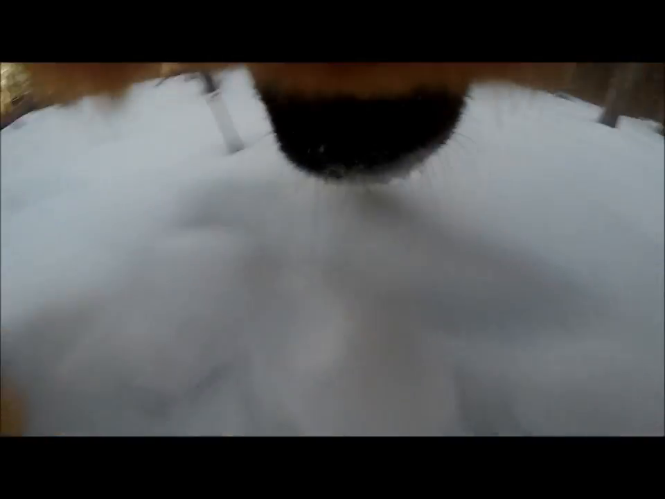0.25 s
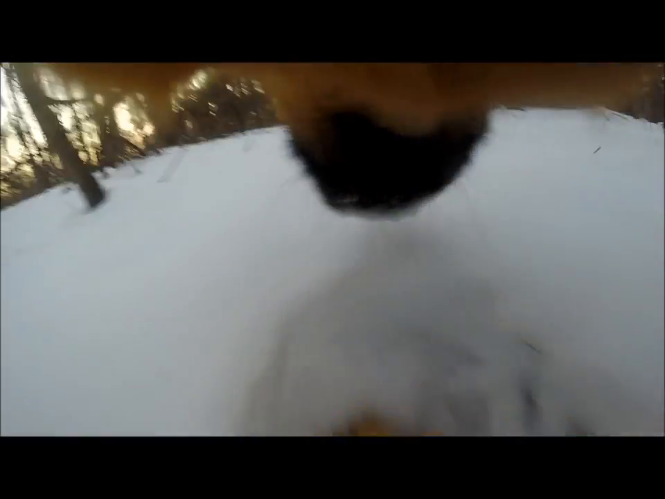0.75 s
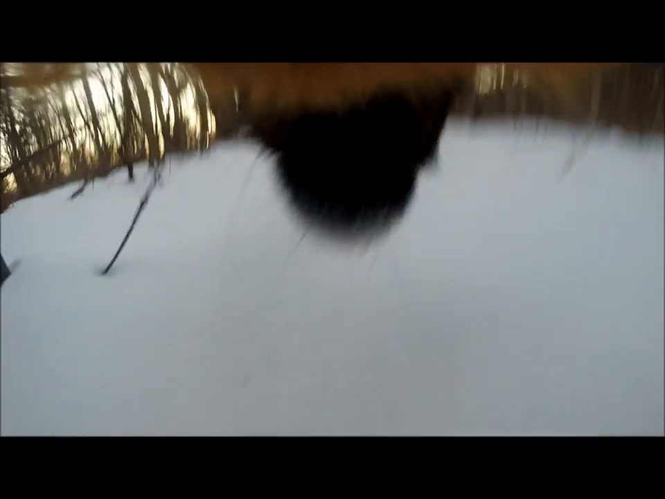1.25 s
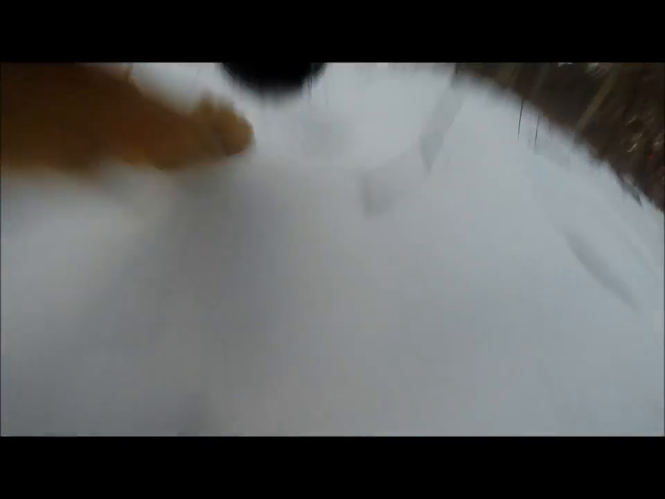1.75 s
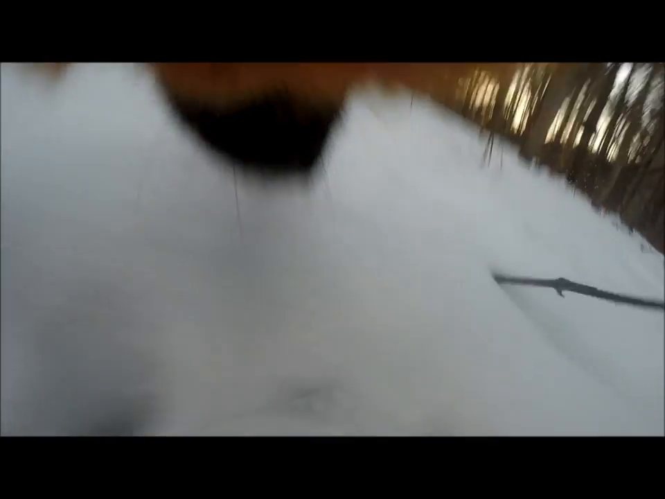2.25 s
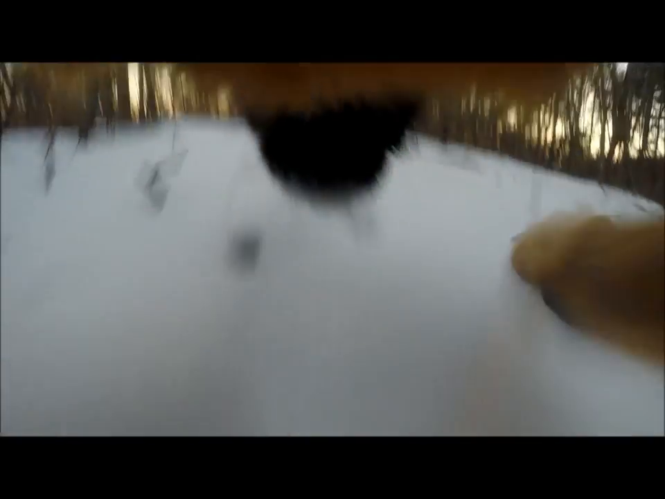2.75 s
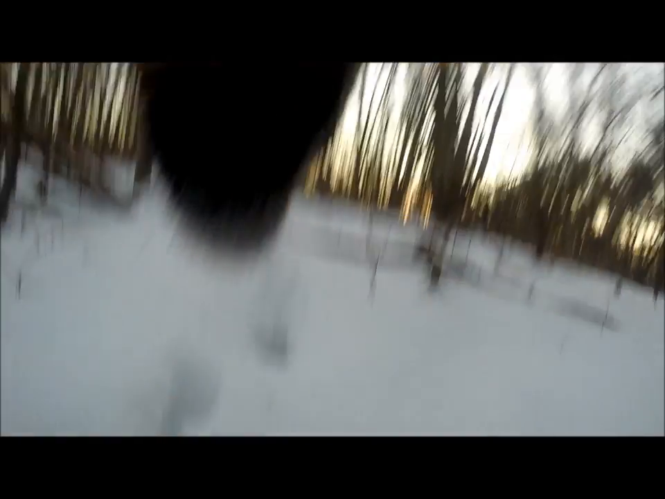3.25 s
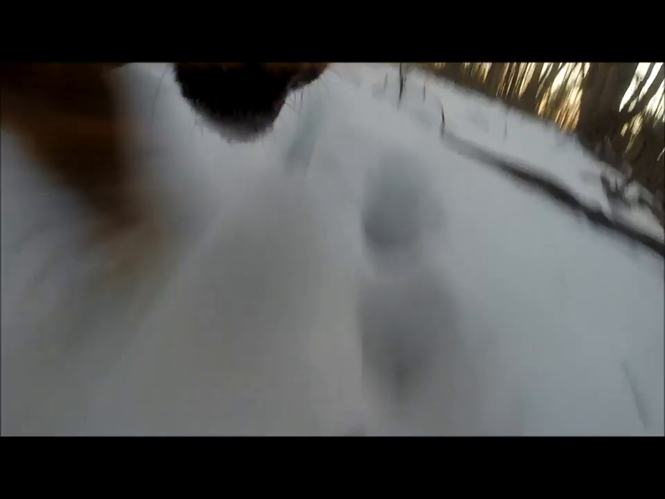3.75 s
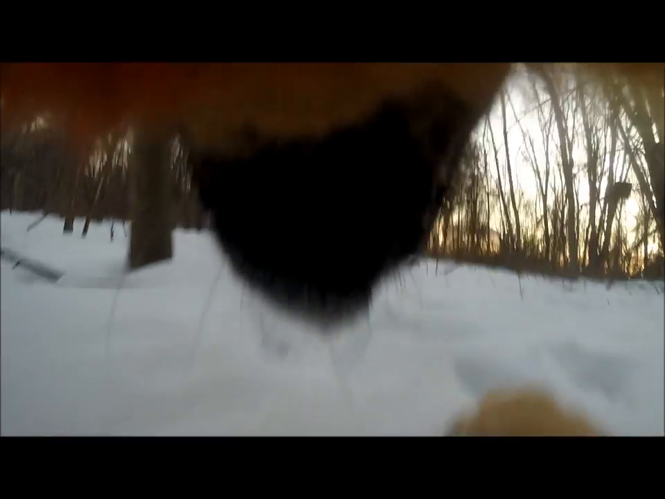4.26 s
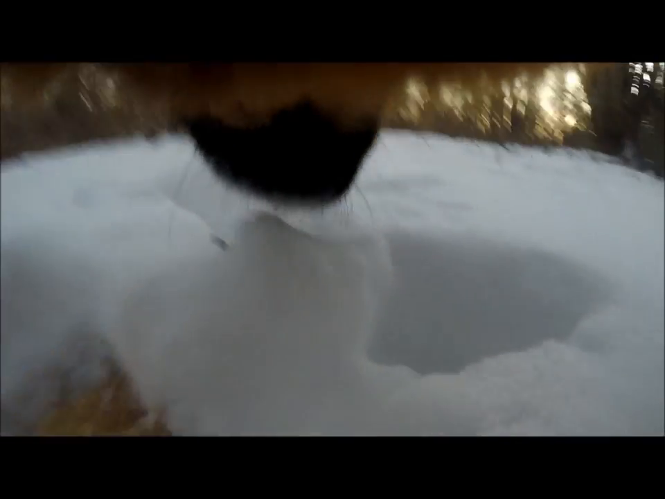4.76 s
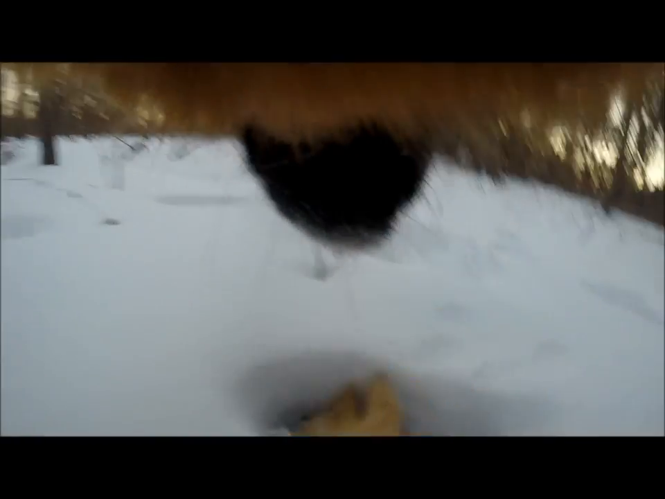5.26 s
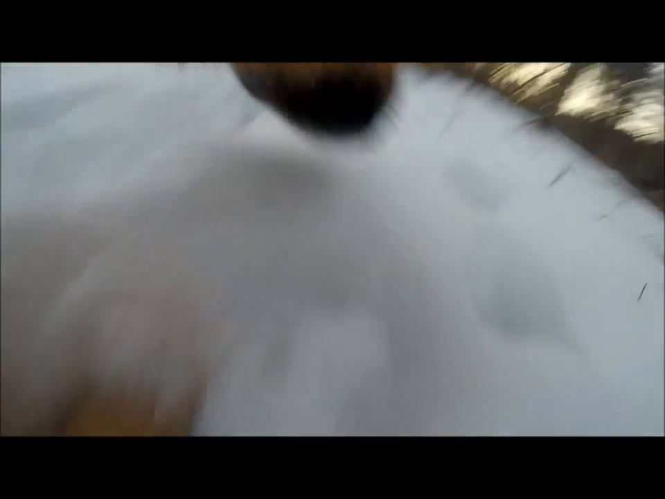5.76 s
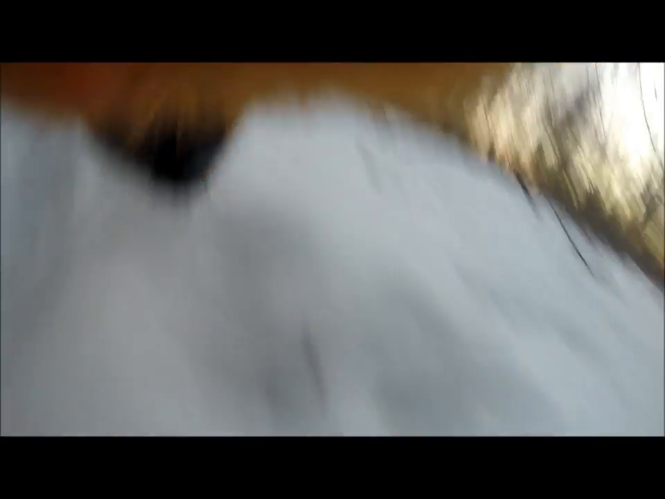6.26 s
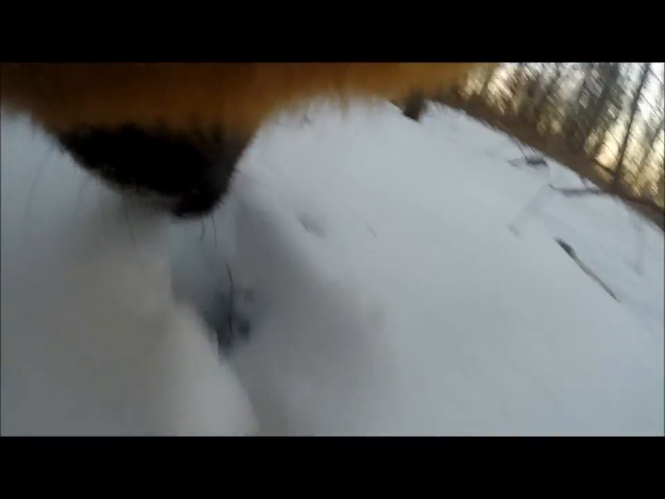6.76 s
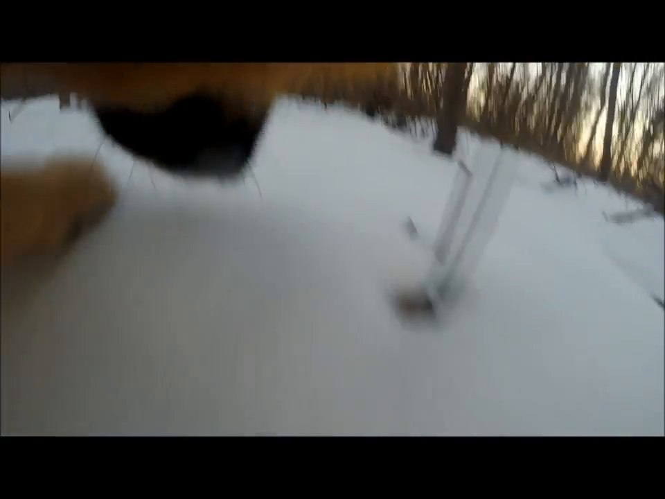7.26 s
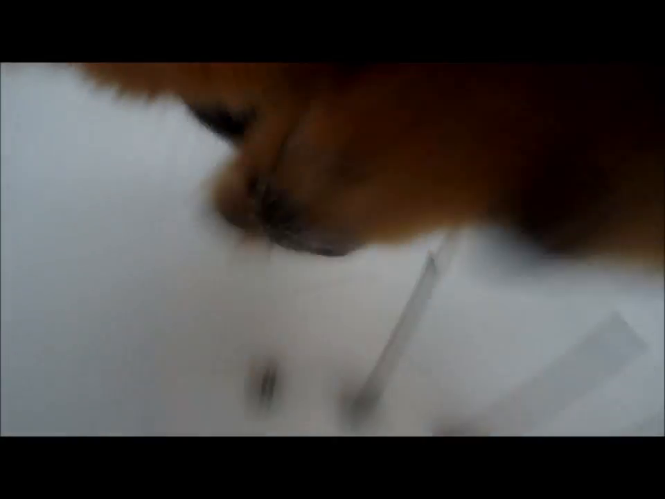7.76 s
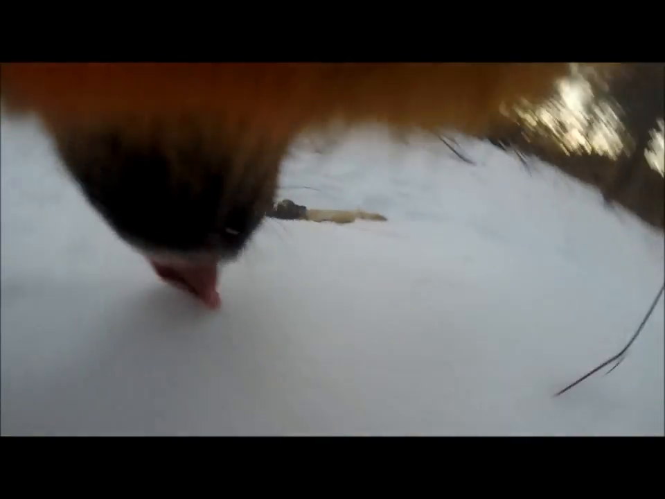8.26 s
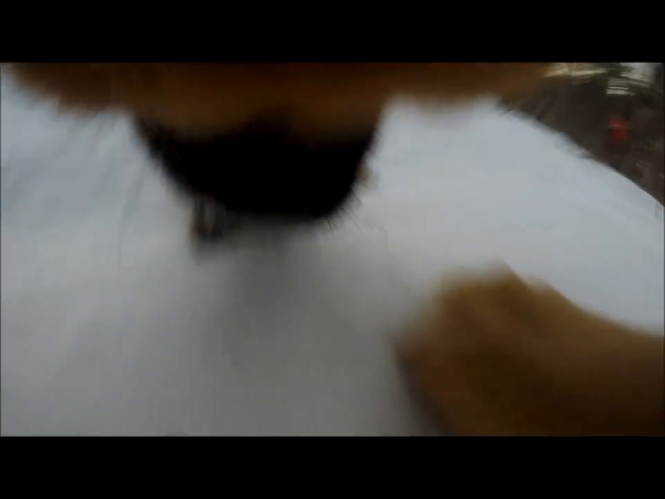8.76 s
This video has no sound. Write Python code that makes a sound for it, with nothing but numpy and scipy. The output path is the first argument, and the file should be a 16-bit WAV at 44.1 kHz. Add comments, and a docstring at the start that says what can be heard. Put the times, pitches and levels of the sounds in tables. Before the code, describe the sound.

A dog runs through crunching snow, its fur rubbing and knocking against a collar-mounted microphone buffeted by air.

```python
"""A dog runs through snow, heard from a cased camera that hangs from its collar.
Each paw fractures the snow with a crunch, over the steady friction of fur on the case. The coat brushes
and scuffs the resonant shell, buckle and ice click on it, leg and chest bump it, and the strap rasps.
Air buffets the microphone throughout. Now and then the case swings hard against the collar:
the blow overloads the microphone and a metal ring sings briefly."""
import sys
import numpy as np
from scipy import signal
from scipy.fft import rfft, irfft, next_fast_len
from scipy.io import wavfile
from scipy.ndimage import map_coordinates

SR = 44100
rng = np.random.default_rng(int(sys.argv[2]) if len(sys.argv) > 2 else 0)


def put_to_file(sound):
    """Save the sound as 16-bit audio at rate SR, in the file named by the first command-line argument."""
    columns = np.atleast_2d(sound).T  # one column per channel
    safe = np.clip(columns, -1, 1)
    whole_steps = np.round(safe * 32767)
    wavfile.write(sys.argv[1], SR, whole_steps.astype(np.int16))


N = 396900
TIME = np.arange(N) / SR

# Spectra of the four registers in which the case passes sound, low to high: frequency_hz, gain_db
THUD_BAND = [(40, -20), (110, 2), (230, 0), (420, -5), (620, -19.5), (1000, -31.5), (2500, -67.5)]
RUB_BAND = [(250, -20.5), (650, -13), (950, -6.5), (1350, -2.5), (1620, -0.5), (1800, -5.5), (2020, -4.5),
            (2350, -11), (4000, -36.5)]
CRUNCH_BAND = [(1200, -34), (2300, -7.5), (2700, 0.5), (3150, 1.5), (3550, -5.5), (3850, -4), (4150, -9.5),
               (4550, -11.5), (5000, -21.5), (8000, -55)]
FIZZ_BAND = [(3000, -32), (5000, -7.5), (5600, 2.5), (6600, -2), (8100, -5), (9000, -10.5), (10200, -8),
             (12000, -8), (13200, -11), (14300, -24), (15300, -27.5), (16500, -36)]
# Contour of the moving dog's steady rustle: time_s, fur_db, loose_snow_db
RUSTLE_CONTOUR = [(0.0, -40, -45), (0.2, -49.5, -53.5), (0.45, -52.5, -54), (1.7, -40, -39.5),
                  (2.83, -45.5, -46.5), (3.58, -42, -44), (3.76, -42.5, -41.5), (4.54, -43, -39),
                  (5.99, -47.5, -51.5), (6.36, -40, -45.5), (6.69, -54, -54), (6.92, -55.5, -66.5),
                  (7.17, -57, -62.5), (7.34, -44, -48.5), (7.72, -42, -48), (8.02, -59.5, -61),
                  (8.57, -52.5, -56), (9.0, -40.5, -38)]
# Hard blows on the case: start_s, push_re_full_scale, push_length_s, crack_db, brightness_db, ring_db
BLOWS = [(.173, -0.044, 0.0016, -5, 2, -32.5), (5.563, -2.27, 0.0022, -2.5, -14.5, -42.5),
         (6.4921, -1.37, 0.00315, -4.5, -5, -46.5), (7.9127, 1.4, 0.0034, -15, 0.5, -47)]


def amp(db):
    """Decibels to amplitude ratio."""
    return 10 ** (np.asarray(db) / 20)


def unit(x):
    """Scale to rms 1."""
    return x / np.sqrt(np.mean(x ** 2) + 1e-20)


def power_sum(*levels):
    """Incoherent sources add in power: their joint level in dB."""
    return 10 * np.log10(sum(amp(db) ** 2 for db in levels) + 1e-12)


def curves(rows):
    """Interpolate each column after the time to one value per sample."""
    times, *columns = np.transpose(rows)
    return [np.interp(TIME, times, column) for column in columns]


def wobble(knots_per_s):
    """Smooth random modulation: a spline through Gaussian knots."""
    return map_coordinates(rng.standard_normal(int(N * knots_per_s / SR) + 4), [TIME * knots_per_s])


def add(track, start_s, sound):
    """Superpose a sound on a track."""
    start = max(round(start_s * SR), 0)
    track[start:start + len(sound)] += sound[:max(N - start, 0)]


def swells(rows):
    """Symmetric swells, summed in power: level in dB."""
    power = np.zeros(N)
    for middle_s, half_length_s, peak_db in rows:
        start_s = middle_s - half_length_s
        swell = amp(peak_db) * np.hanning(int(2 * half_length_s * SR))
        add(power, start_s, swell[max(round(-start_s * SR), 0):] ** 2)
    return 10 * np.log10(power + 1e-12)


def highpass(x, hz, order):
    """Butterworth high-pass filter."""
    return signal.sosfilt(signal.butter(order, hz, 'high', fs=SR, output='sos'), x)


def resonance(x, hz, width_hz):
    """A second-order resonator with gain 1 at its centre."""
    return signal.lfilter(*signal.iirpeak(hz, hz / width_hz, fs=SR), x)


def response(band, size=8192):
    """Minimum-phase impulse response of a spectrum, with energy 1."""
    hz, db = np.transpose(band)
    gain = amp(np.interp(np.log(np.fft.rfftfreq(size, 1 / SR) + 1), np.log(hz), db))
    cepstrum = irfft(np.log(gain))
    cepstrum[1:size // 2] *= 2
    cepstrum[size // 2 + 1:] = 0
    impulse = irfft(np.exp(rfft(cepstrum)))[:size // 2]
    return impulse / np.linalg.norm(impulse)


def colour(drive, band):
    """Source and filter: convolution gives an excitation the band's spectrum."""
    return signal.fftconvolve(drive, response(band))[:N]


def snaps(per_s, spread_db):
    """Shot noise: randomly timed impulses of uneven size, rms 1."""
    sizes = amp(spread_db * np.minimum(rng.exponential(size=N), 3))
    return unit((rng.random(N) < per_s / SR) * sizes * rng.choice([-1, 1], N))


def grains(band, per_s, spread_db, share):
    """Granular noise, rms 1: tiny slips and fractures carry a share of the power, a smooth rush the rest."""
    drive = np.sqrt(share) * snaps(per_s, spread_db) + np.sqrt(1 - share) * rng.standard_normal(N)
    return unit(colour(drive, band))


def contact(impulse, t60_s):
    """Exponentially decaying chatter excites the case; its energy equals 2.9 ms at rms 1."""
    t = TIME[:SR // 20]
    chatter = rng.standard_normal(len(t)) * amp(-60 * t / t60_s)
    sound = signal.fftconvolve(chatter, impulse)
    return sound * np.sqrt(0.0029 * SR) / np.linalg.norm(sound)


def shell(x):
    """Resonances and antiresonances of the plastic shell give contact sounds a hollow colour."""
    # Peaks and nulls of the shell: centre_hz, width_hz, gain_db
    modes = [(1006, 260, 2), (1110, 43, -4.5), (1212, 96, 2.5), (1562, 160, 3.5), (1950, 220, 3),
             (2225, 85, -13.5), (2440, 270, -1), (2865, 63, -10), (3500, 220, 3), (4220, 200, 2.5),
             (4680, 240, 4.5), (5070, 250, 0), (5850, 200, 2), (5900, 330, -11), (6580, 240, 0),
             (7060, 290, -4), (8100, 360, -0.5), (9940, 280, 3)]
    for hz, width_hz, gain_db in modes:
        x = x + (amp(gain_db) - 1) * resonance(x, hz, width_hz)
    return x


def paw_levels():
    """Attack, sag and release as each paw breaks in, presses and lets go: crunch and powder in dB."""
    # Paws sinking into snow: start_s, press_s, crunch_db, powder_re_crunch_db
    steps = [(-.015, 0.024, -26, -2.5), (.06, 0.078, -40.5, -11.5), (.548, 0.016, -46, -15),
             (.75, 0.04, -44.5, -12), (.875, 0.013, -38.5, -20), (1.038, 0.027, -35, -10.5),
             (1.243, .04, -31, -8), (1.33, 0.035, -36.5, -10), (1.418, 0.077, -49, -10),
             (1.573, 0.041, -28, -11), (1.679, 0.027, -34.5, -9.5), (1.92, 0.065, -32, -11),
             (2.0, 0.025, -48, -16), (2.212, .025, -35, -7), (2.239, 0.053, -24.5, -10.5),
             (2.344, 0.032, -33.5, -14), (2.574, .04, -38, -7.5), (2.935, .07, -31.5, -9.5),
             (3.05, 0.014, -40, -9), (3.62, 0.11, -36, -10), (3.724, 0.054, -32.5, -14),
             (3.887, 0.11, -30.5, -10), (3.98, 0.059, -29.5, -13.5), (4.323, .04, -28.5, -12),
             (4.4, 0.095, -38.5, -11), (4.5, 0.099, -39, -19), (4.59, 0.11, -44, -12),
             (4.733, 0.038, -32, -4.5), (4.87, 0.024, -52, -20), (4.97, 0.043, -41.5, -13),
             (5.288, 0.072, -31.5, -10.5), (6.644, 0.016, -41, -5), (6.73, 0.17, -52.5, -9.5),
             (7.325, 0.13, -39, -6.5), (7.475, 0.046, -37, -11.5), (7.71, 0.071, -43.5, -3.5),
             (8.308, 0.11, -53, -1.5), (8.43, 0.038, -50.5, -9), (8.69, 0.019, -39, -7.5),
             (8.86, 0.032, -33.5, -7.5), (8.96, 0.036, -45, -1)]
    attack_s, sag_db_per_s, release_t60_s = 0.011, 20, 0.21
    crunch, powder, t = np.zeros(N), np.zeros(N), TIME[:SR // 2]
    for start_s, press_s, crunch_db, powder_db in steps:
        fall_db = sag_db_per_s * t + 60 * np.maximum(t - press_s, 0) / release_t60_s
        power = (np.minimum(t / attack_s, 1) * amp(crunch_db - fall_db)) ** 2
        power = power[max(round(-start_s * SR), 0):]
        add(crunch, start_s, power)
        add(powder, start_s, power * amp(powder_db) ** 2)
    return 10 * np.log10(np.array([crunch, powder]) + 1e-12)


def stride_levels():
    """Brushes and steps add in power to the steady rustle: levels of fur, snow and powder in dB."""
    # The coat brushing softly past the case: middle_s, half_length_s, peak_db
    brushes = [(.03, 0.089, -39.5), (0.144, .08, -38), (1.06, 0.032, -36), (1.14, 0.028, -51),
               (1.225, 0.05, -35), (1.47, 0.22, -40.5), (1.748, 0.088, -36), (2.14, 0.046, -65),
               (2.279, 0.23, -41.5), (2.41, 0.058, -36.5), (2.77, 0.04, -42), (2.866, 0.076, -37.5),
               (3.06, 0.18, -44), (3.23, 0.18, -40.5), (3.518, 0.044, -32.5), (3.667, 0.087, -39.5),
               (3.756, 0.037, -34), (3.94, 0.24, -38), (4.37, 0.11, -44), (4.526, 0.084, -40.5),
               (4.671, 0.062, -35.5), (5.054, 0.084, -40), (5.165, 0.037, -35), (5.27, 0.026, -35.5),
               (5.377, 0.034, -36), (5.493, 0.099, -42), (5.78, 0.035, -48), (6.23, 0.066, -41),
               (6.357, 0.054, -33), (6.955, .05, -51), (7.1, 0.028, -50.5), (7.19, 0.087, -45.5),
               (7.26, 0.036, -41.5), (7.37, 0.046, -39), (7.516, 0.11, -39.5), (7.606, 0.065, -43),
               (7.759, 0.086, -34), (7.868, 0.058, -41.5), (8.47, 0.077, -49.5), (8.72, 0.041, -41.5),
               (8.99, 0.049, -37)]
    fur_db, snow_db = curves(RUSTLE_CONTOUR)
    depth_db, delay_s, width_s = 10, 0.068, 0.029  # a blow throws the case clear of the fur: a lull
    lull_db = sum(depth_db * np.exp(-((TIME - blow_s - delay_s) / width_s) ** 2) for blow_s, *_ in BLOWS)
    step_db, spray_db = paw_levels()
    coat_db = fur_db - 1 - lull_db + 1.2 * wobble(25)
    loose_db = snow_db - 1.5 - lull_db + wobble(25)
    dust_db = -57 + 0.86 * (loose_db + 50)  # powder grows a little more slowly than the loose snow
    return power_sum(coat_db, swells(brushes)), power_sum(loose_db, step_db), power_sum(dust_db, spray_db)


def fur_friction(crust):
    """Sliding friction: fur excites now the lower, now the upper panel resonance of the case."""
    rub = grains(RUB_BAND, per_s=650, spread_db=5, share=0.45) + 0.7 * colour(crust, RUB_BAND)
    slide = np.tanh(wobble(14))
    panels = resonance(rub, hz=1530, width_hz=430) - resonance(rub, hz=1310, width_hz=100)
    weight = amp(-9) * grains(THUD_BAND, per_s=140, spread_db=5.5, share=0.81)
    return unit(rub + 1.3 * slide * panels) + weight


def snow_crunch(crust, level_db):
    """Brittle fracture: the harder the snow is pressed, the more it sings in one hollow resonance."""
    crunch = grains(CRUNCH_BAND, per_s=1500, spread_db=-1.5, share=0.29) + colour(crust, CRUNCH_BAND)
    pressed = np.clip((level_db + 56) / 25, 0, 1)
    hollow = 2.16 * pressed * resonance(crunch, hz=3567, width_hz=370)
    return (crunch + hollow) / (1 + 1.11 * pressed)


def stride():
    """Amplitude-modulated granular noise: fur rubs the case while paws crush snow and throw powder."""
    fur_db, snow_db, powder_db = stride_levels()
    clumps_db = 1.9 * wobble(90)  # snow gives way in small lumps
    crust = amp(-5.5) * snaps(per_s=170, spread_db=5.5)  # larger fractures crackle across the treble
    fur = fur_friction(crust)
    snow = snow_crunch(crust, snow_db)
    powder = grains(FIZZ_BAND, per_s=6600, spread_db=10.5, share=0.18) + colour(crust, FIZZ_BAND)
    return (amp(fur_db - 4.13 + 0.62 * wobble(60)) * fur
            + amp(snow_db - 1.5 + clumps_db) * snow
            + amp(powder_db - 2.77 + clumps_db) * powder)


def buffet():
    """Turbulent air presses on the microphone: steadily as the dog moves, harder with every swing."""
    # Swings of the camera through the air: middle_s, half_length_s, peak_db
    swings = [(.9, 0.18, -45), (1.2, 0.34, -33), (1.57, 0.1, -24.5), (1.72, 0.37, -33), (2.0, 0.15, -25),
              (2.26, 0.21, -32), (2.63, .08, -38), (2.97, 0.13, -34), (3.22, 0.11, -28), (3.33, 0.046, -33),
              (3.6, 0.088, -27), (3.76, 0.057, -34), (3.94, 0.11, -24.5), (4.06, .08, -30),
              (4.25, .06, -42), (4.44, 0.084, -32), (5.12, 0.056, -30.5), (5.46, 0.16, -35),
              (5.9, 0.07, -33), (6.32, 0.057, -27), (7.63, 0.26, -34), (8.77, 0.18, -37), (8.94, 0.33, -37)]
    # Spectrum of the buffeting: frequency_hz, gain_db
    rumble_band = [(8, -1), (22, 8.5), (42, -6.5), (70, -11.5), (120, -28), (250, -33), (500, -42.5),
                   (1500, -78.5)]
    fur_db, _ = curves(RUSTLE_CONTOUR)
    level_db = power_sum(fur_db + 1.5, swells(swings))
    gusts = amp(3.9 * wobble(39)) * rng.standard_normal(N)
    return amp(level_db) * unit(colour(gusts, rumble_band))


def knocks():
    """Impact: a blow compresses the air in the case, cracks on the shell and excites the ring's modes."""
    # Modes of the metal collar ring: pitch_hz, level_db, t60_s
    ring_modes = [(1870, 2.5, 0.42), (3112, -16.5, .06)]
    mount_hz, mount_db, mount_t60_s = 372, -55, 0.35  # a heavy push leaves the mount humming
    thud, rub, crunch, fizz = [response(band) for band in (THUD_BAND, RUB_BAND, CRUNCH_BAND, FIZZ_BAND)]
    rub = rub + 1.6 * resonance(rub, hz=770, width_hz=120)  # the whole shell flexes
    pressure, clack, t = np.zeros(N), np.zeros(N), TIME[:SR // 2]
    for start_s, push, push_s, crack_db, bright_db, ring_db in BLOWS:
        add(pressure, start_s, push * np.sin(np.pi * np.minimum(t / push_s, 1)))
        edge = contact(crunch, t60_s=0.017) + amp(-14) * contact(fizz, t60_s=0.01)
        body = contact(rub, t60_s=0.022) + amp(-8.5) * contact(thud, t60_s=0.017)
        add(clack, start_s + 0.00012, amp(crack_db) * (body + amp(bright_db) * edge))
        for hz, db, t60_s in ring_modes:
            add(clack, start_s, amp(ring_db + db - 60 * t / t60_s) * np.sin(2 * np.pi * hz * t))
        hum = amp(mount_db - 60 * t / mount_t60_s) * np.sin(2 * np.pi * mount_hz * t)
        add(clack, start_s, push * hum)
    return clack + highpass(pressure, hz=32, order=2)  # air leaks out, so the pressure swings back


def clicks():
    """Impulse excitation: buckle and ice crumbs tap the plastic, whose struck spot rings briefly."""
    # Small hard contacts: start_s, level_db, hardness_db (treble over midrange), spot_hz
    taps = [(0.179, -16, -4.5, 1540), (.1899, -33, -3, 3360), (0.1937, -28, 16, 4650),
            (0.3593, -39, 13, 2950), (1.123, -44, 16, 3870), (1.9291, -28, 1.5, 3230),
            (2.3628, -33, 6, 3720), (2.382, -28.5, 14, 2580), (2.5259, -22, 3, 2940),
            (3.2193, -36, -10, 2000), (3.9345, -43.5, -23, 1860), (4.0023, -36, 6, 3300),
            (4.1613, -24, 7, 5660), (4.168, -32, 28, 7500), (4.7067, -24, -3, 3050),
            (4.7582, -33, 24, 6900), (4.9903, -26.5, 11.5, 3080), (5.047, -32.5, 40, 3270),
            (5.137, -16.5, 45, 3630), (5.172, -36, -2, 1400), (5.6118, -38, 1, 4480),
            (5.6705, -40, -13.5, 1300), (5.8754, -28, 0.5, 4000), (6.3441, -22, 8, 2900),
            (7.217, -42, 4, 3040), (7.8014, -33.5, 7, 1370), (8.2314, -41.5, 1.5, 1530),
            (8.5793, -38, 5.5, 6440), (8.6672, -43, -3, 2720), (8.762, -21.5, 16, 4400)]
    impulses = [response(band) for band in (RUB_BAND, CRUNCH_BAND, FIZZ_BAND)]
    track = np.zeros(N)
    for start_s, level_db, hardness_db, spot_hz in taps:
        bands_db = level_db + np.array([-hardness_db, 0, 0.14 * hardness_db - 3])
        edge_hz = 69 * max(hardness_db, 1)  # the harder the contact, the higher its lower edge
        for impulse, db, t60_s in zip(impulses, bands_db, (0.014, 0.011, 0.009)):
            spot = impulse + 2.6 * resonance(impulse, spot_hz, width_hz=150)
            add(track, start_s, amp(db + 1) * contact(highpass(spot, edge_hz, order=6), t60_s))
    return track


def scuffs():
    """Stick-slip friction: short scrapes swell and stop, each squeaking at its own pitch."""
    # Fur and snow scraping the case: time_s, core_s, rub_db, weight_re_rub_db, grit_re_rub_db, squeak_hz
    scrapes = [(0.482, 0.049, -41.5, -1, -2, 2020), (0.63, 0.039, -36, 4, -1.5, 1590),
               (0.7, 0.036, -39.5, 6, 2, 1200), (1.21, 0.032, -38, -0.5, 2.5, 1560),
               (1.554, 0.03, -32, -7, -9, 1550), (1.64, 0.029, -43, 3.5, 5.5, 1590),
               (1.854, 0.018, -36.5, -8, 2.5, 1700), (1.868, 0.022, -26, -8, 7, 1860),
               (1.887, 0.052, -37, -8, 4, 1710), (2.204, 0.006, -27, -7, -20, 1660),
               (2.316, 0.026, -36.5, -2.5, 1, 2030), (2.503, 0.039, -33, 0.5, 2, 1610),
               (2.649, 0.016, -38, 2, -17, 1530), (3.184, 0.038, -38, -1.5, -5, 1980),
               (3.313, 0.03, -36.5, -0.5, -6, 1670), (3.572, 0.041, -37.5, -4, -4, 1570),
               (3.928, 0.024, -34, -6.5, -3, 1950), (4.035, 0.035, -30, -3, -12, 1340),
               (4.233, 0.034, -36.5, -20, -18, 1690), (4.328, 0.0064, -29, -11, 0, 1570),
               (4.412, 0.023, -29, 0, -13.5, 1330), (4.823, 0.024, -36.5, -4.5, -9, 1670),
               (5.2876, 0.013, -47, -2, 12, 1560), (5.659, 0.034, -36.5, -1.5, -7, 1420),
               (5.856, 0.038, -36.5, 0.5, -6, 1470), (6.009, 0.026, -39.5, -2, -8.5, 1350),
               (6.106, 0.01, -49, -18, 15.5, 1840), (6.143, 0.037, -23, 2, -9.5, 1350),
               (6.292, 0.03, -41.5, 5.5, -16, 1460), (6.465, 0.01, -35.5, -3, -29, 1270),
               (6.529, 0.061, -51.5, -8, 10, 1780), (7.333, 0.021, -44, -22, -2, 1420),
               (7.828, 0.033, -44.5, 6.5, 0.5, 1410), (7.983, .017, -49, 2.5, -8.5, 1460),
               (8.807, 0.039, -34.5, -14.5, -9.5, 1730), (8.859, .013, -49, -0.5, 15, 1520)]
    slips = amp(3.53 * wobble(350))
    textures = [slips * grains(band, per_s=800, spread_db=2, share=0.7)
                for band in (THUD_BAND, RUB_BAND, CRUNCH_BAND, FIZZ_BAND)]
    track = np.zeros(N)
    for time_s, core_s, rub_db, weight_db, grit_db, squeak_hz in scrapes:
        bands_db = rub_db + np.array([weight_db, 0, grit_db, grit_db - 3])
        start_s = time_s - 0.0847 * core_s  # the swell extends past the core at both ends
        count = int(1.316 * core_s * SR)
        swell = np.sin(np.pi * np.arange(count) / count) ** 0.87
        thud, rub, crunch, fizz = [texture[round(start_s * SR):][:count] for texture in textures]
        rub = rub + 1.1 * resonance(rub, squeak_hz, width_hz=150)
        for part, db in zip((thud, rub, crunch, fizz), bands_db):
            add(track, start_s, amp(db - 2) * unit(swell * part))
    return track


def thumps():
    """Elastic recoil: a soft bump compresses the air in the case, which springs back more slowly."""
    # Leg and chest bumping the case: start_s, level_db, rise_s, recoil_share
    bumps = [(0.7147, -3.5, 0.0017, .15), (1.547, -20.5, 0.0017, .8), (1.879, -5.5, 0.006, .5),
             (1.993, -21.5, 0.0017, .3), (2.507, -0.5, 0.0013, .9), (2.525, -1, 0.0021, .1),
             (5.59, -18.5, 0.002, .1), (6.285, -21, 0.0014, .8), (6.587, -22, .0069, .1),
             (7.844, -16, 0.0036, .1)]
    recoil_delay, recoil_rise = 4.5, 5.3  # in rise times of the bump
    pressure, t = np.zeros(N), TIME[:SR // 8]
    pulse = lambda u: (u * np.exp(1 - u)) ** 2
    for start_s, level_db, rise_s, recoil_share in bumps:
        recoil = pulse(np.maximum(t / rise_s - recoil_delay, 0) / recoil_rise)
        add(pressure, start_s, amp(level_db) * (recoil_share * recoil - pulse(t / rise_s)))
    return highpass(pressure, hz=22, order=1)  # air leaks out


def strap():
    """Stick-slip friction: the webbing catches in uneven strokes and excites narrow modes of the mount."""
    # The collar strap dragging over the case: time_s, level_db
    drag = [(5.9, -79), (6.3, -61), (6.7, -61.5), (7.08, -72), (7.18, -43), (7.3, -54), (7.5, -43.5),
            (7.65, -59), (7.78, -45), (7.9, -46), (7.93, -85)]
    # Modes of the mount: centre_hz, width_hz, gain_db
    modes = [(2040, 58, 2.5), (2190, 40, 8), (4590, 200, -14.5), (10100, 350, -24.5)]
    level_db, = curves(drag)
    slips = snaps(per_s=500, spread_db=0.5) * amp(2.5 * wobble(48))
    rasp = sum(amp(db) * resonance(slips, hz, width_hz) for hz, width_hz, db in modes)
    return amp(level_db) * unit(rasp)


def scene():
    """Superposition at one microphone; the shell filters the stride, scuffs and clicks."""
    contacts = shell(stride() + scuffs() + clicks())
    return (contacts + strap() + knocks() + thumps() + buffet())[None]


def record(dry):
    """Saturation and band limiting: hard blows flatten near full scale, and the top treble is cut."""
    ceiling, top_hz, taper_hz = 0.97, 16400, 1400
    saturated = np.clip(dry, -ceiling, ceiling)
    size = next_fast_len(N + SR // 2)
    hz = np.fft.rfftfreq(size, 1 / SR)
    passband = np.clip((top_hz - hz) / taper_hz, 0, 1)
    return irfft(rfft(saturated, size) * passband, size)[..., :N]


dry = scene()
out = record(dry)
put_to_file(out)
```